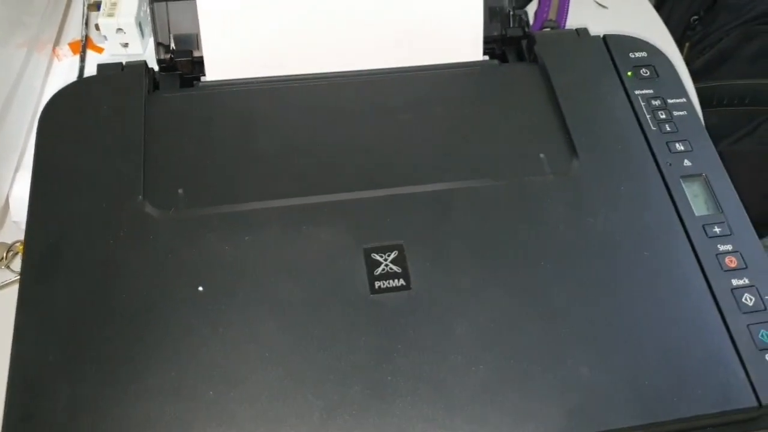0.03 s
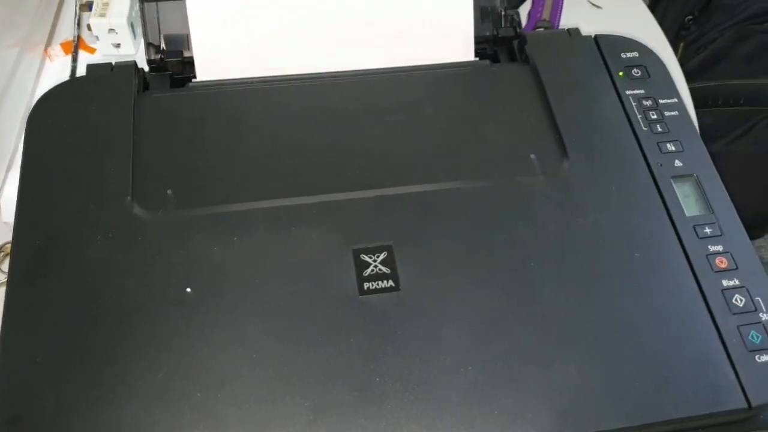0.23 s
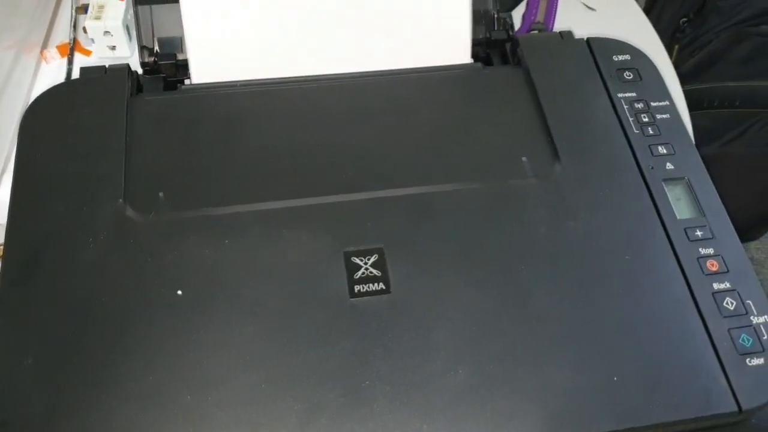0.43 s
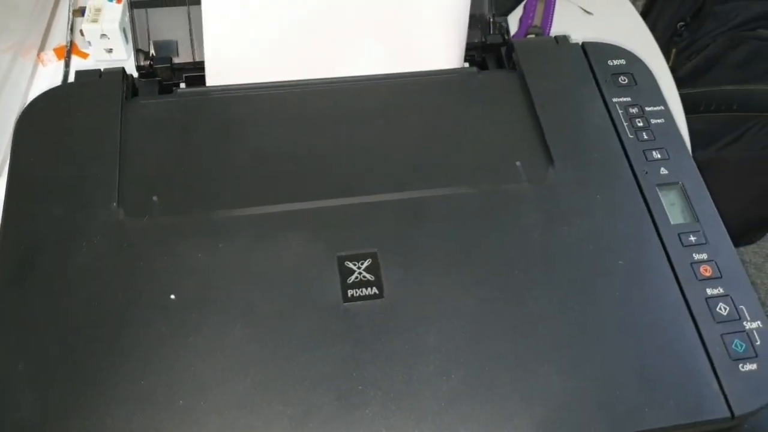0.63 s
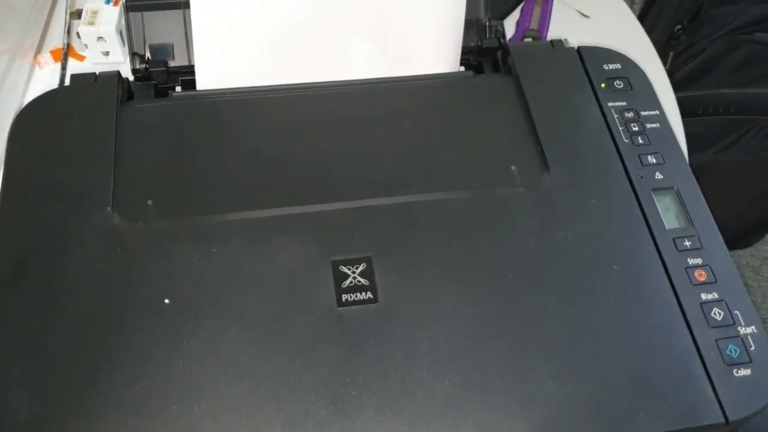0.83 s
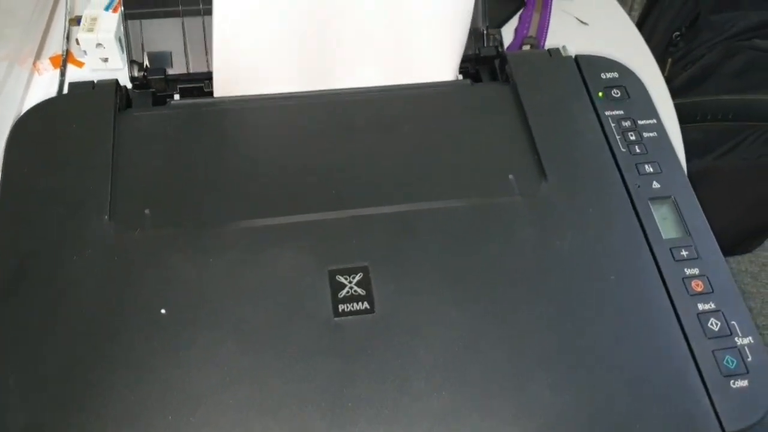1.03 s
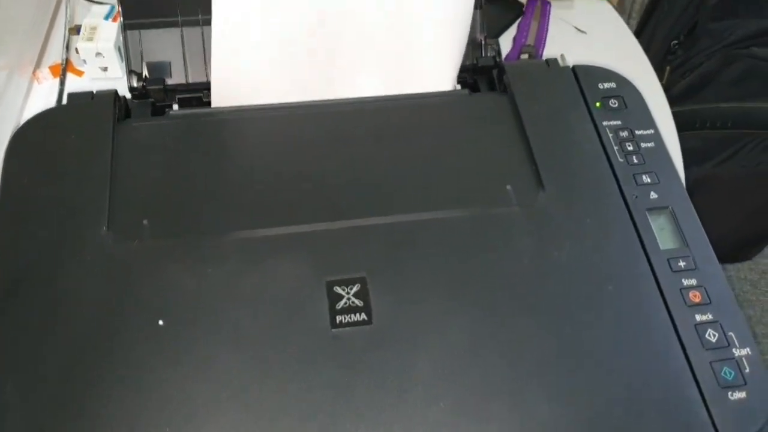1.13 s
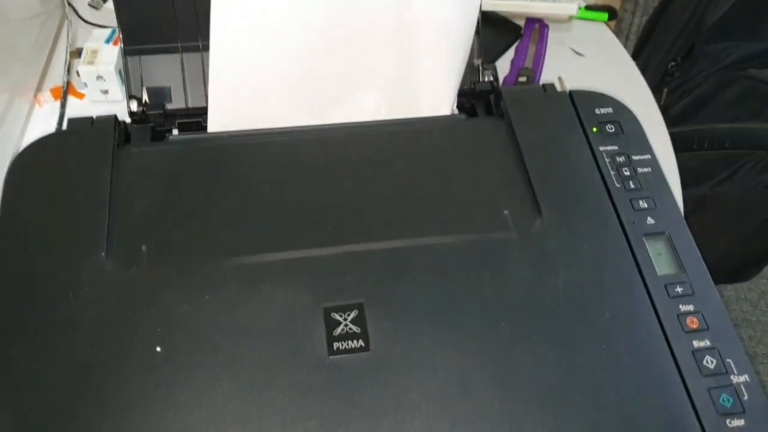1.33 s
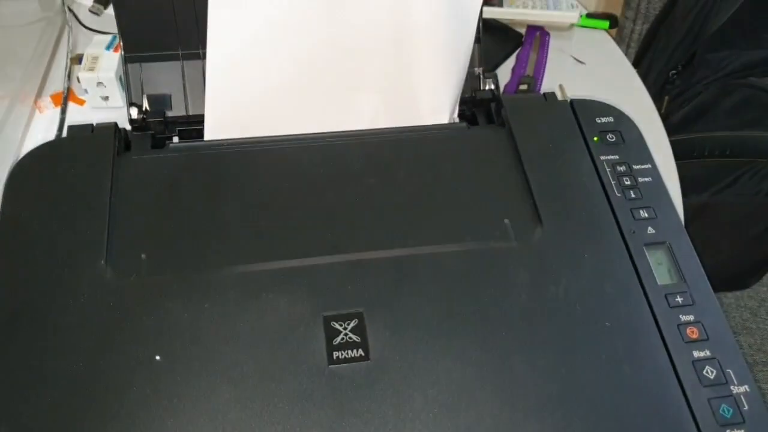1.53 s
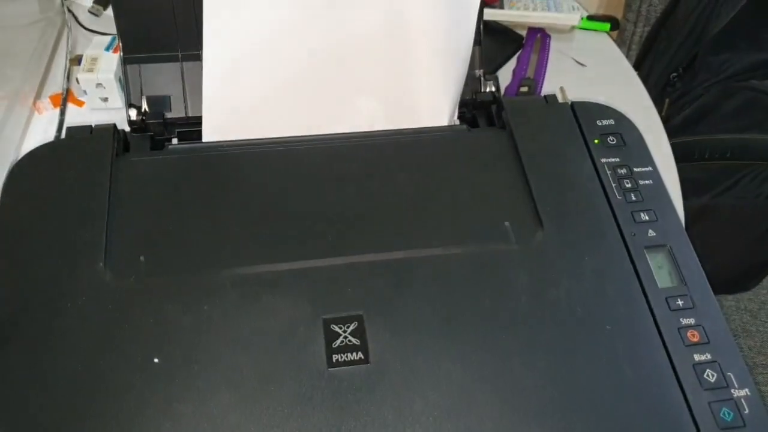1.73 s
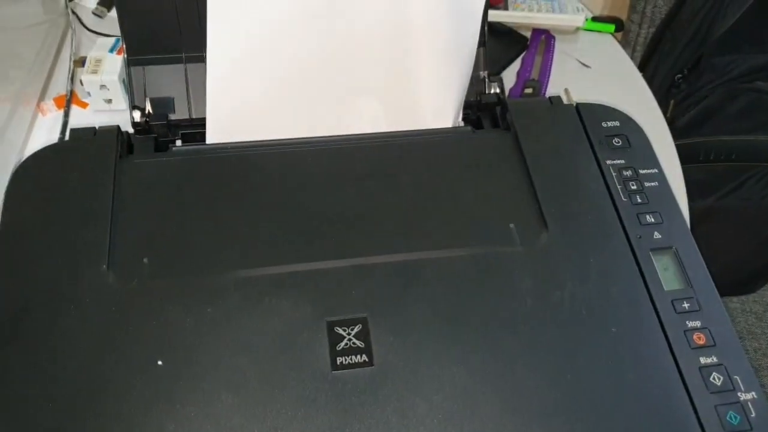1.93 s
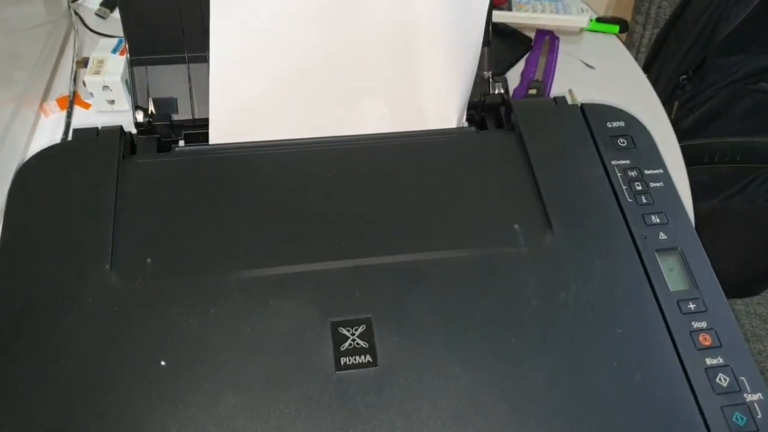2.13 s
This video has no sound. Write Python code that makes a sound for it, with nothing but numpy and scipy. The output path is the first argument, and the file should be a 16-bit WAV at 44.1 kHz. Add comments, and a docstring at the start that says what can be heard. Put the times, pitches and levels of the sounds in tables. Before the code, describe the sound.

A desktop printer feeds paper with a grainy whir in uneven bursts and hard plastic clacks, strongest early on, then fades to faint ticks and a softly humming small room, heard in close stereo.

```python
"""In a small room with air noise and a faint low hum, a desktop printer feeds a sheet.
Its whir, dense random contacts in filtered bands, starts at once and comes in uneven bursts.
Clacks soon join it, each a dying rattle plus a ringing knock; then brief gliding sine tones sing.
The whir winds down into the quiet room, whose short echoes are feedback delays.
A spaced pair of microphones listens from just above the lid."""
import sys
import numpy as np
from scipy import signal
from scipy.io import wavfile

SR = 44100
rng = np.random.default_rng(int(sys.argv[2]) if len(sys.argv) > 2 else 0)


def master_out(mix):
    """Clip the mix to full scale and print it as 16-bit PCM to the path in sys.argv[1]."""
    frames = np.transpose(np.atleast_2d(mix))
    ceiling = np.clip(frames, -1, 1)
    pcm = np.round(ceiling * 32767).astype(np.int16)
    wavfile.write(sys.argv[1], SR, pcm)


N = 97020  # samples, 2.2 s


def from_db(db):
    """Decibels to gain."""
    return 10 ** (np.asarray(db) / 20)


def rms_one(x):
    """Scale to unit rms."""
    return x / np.sqrt(np.mean(x ** 2) + 1e-20)


def at_hz(points, hz):
    """Read a spectrum table on a log-frequency axis."""
    table_hz, values = np.array(points).T
    return np.interp(np.log(hz), np.log(table_hz + 1), values)


def drift(rate_hz):
    """Slow random wander of spread 1: noise through a two-pole lowpass, at a fortieth of the sample rate."""
    step = 40
    r = np.exp(-2 * np.pi * rate_hz * step / SR)
    noise = rng.standard_normal(N // step + 2002)
    slow = signal.lfilter([1], [1, -2 * r, r * r], noise)[2000:]  # skip the filter's start
    return np.interp(np.arange(N) / step, np.arange(len(slow)), rms_one(slow))


def resonance(x, hz, width_hz):
    """Two-pole resonance of gain 1 on top."""
    r = np.exp(-np.pi * max(width_hz, 5) / SR)
    top = (1 - r * r) / 2 * np.array([1, 0, -1])
    return signal.lfilter(top, [1, -2 * r * np.cos(2 * np.pi * hz / SR), r * r], x)


BASS_HZ, TREBLE_HZ = 500, 7000


def by_range(hz, bass_db, treble_db):
    """Extra level of a band: bass below BASS_HZ, treble above TREBLE_HZ, each faded in over a half octave."""
    def fade(ratio):
        return np.clip(.5 + 2 * np.log2(ratio), 0, 1)
    return fade(BASS_HZ / hz) * bass_db + fade(hz / TREBLE_HZ) * treble_db


def band_power(colour):
    """Rms that unit white noise keeps between BASS_HZ and TREBLE_HZ after a colour."""
    hz = np.linspace(BASS_HZ, TREBLE_HZ, 500)
    mean_power = np.mean(from_db(2 * at_hz(colour, hz)))
    return np.sqrt(mean_power * (TREBLE_HZ - BASS_HZ) / (SR / 2))


# How alike the sound reaches the two microphones. Each row: frequency in Hz, likeness from 0 to 1.
MIC_LIKENESS = [(60, 0.89), (300, 1), (640, 0.52), (1400, 0), (3100, 0.063), (7000, 0)]
# How the sound leans between the microphones. Each row: frequency in Hz, left minus right in dB.
MIC_LEAN = [(60, -5.5), (300, 0), (2400, -1.5), (10000, 0.6)]


def bank(drive, gain_at, colour):
    """Excitation (2 draws x mid, side) shaped in third-octave bands, then spread over the microphone pair."""
    out = 0
    edges = 25 * 2 ** np.arange(0, 9.4, 1 / 3)
    for k, (low, high) in enumerate(zip(edges, edges[1:])):
        hz = np.sqrt(low * high)
        sos = signal.butter(2, [low, high], "band", fs=SR, output="sos")
        # neighbouring bands use different draws
        mid, side = signal.sosfilt(sos, drive[k % 2] * gain_at(hz) + 1e-18)
        alike = np.clip(at_hz(MIC_LIKENESS, hz), -1, 1)
        lean = from_db(at_hz(MIC_LEAN, hz) / 2 * np.array([[1], [-1]]))
        pair = np.sqrt(1 + alike) * mid + np.sqrt(1 - alike) * side * [[1], [-1]]
        out = out + from_db(at_hz(colour, hz)) * lean * pair
    return out


# Resonances of the plastic case. Each row: frequency in Hz, width in Hz, relative lift in dB.
CASE_MODES = [(247.8, 27.2, 3), (334.7, 32.7, 3), (400, 54, -4.5), (909, 69, 3), (1882, 66, 4)]


def case(x, share_db):
    """The plastic case adds its resonances to the sound, each at its lift plus a share."""
    return x + sum(from_db(db + share_db) * resonance(x, hz, width) for hz, width, db in CASE_MODES)


# Colour of the air in the room. Each row: frequency in Hz, relative density in dB per Hz.
AIR_COLOUR = [(25, -30.5), (50, -7.5), (100, -17), (400, -18), (520, -23.5), (2400, -24), (6300, -35),
              (8000, -76.5), (11500, -44.5), (15700, -66)]
AIR_DB = -52.5  # rms
HUM_HZ, HUM_WIDTH_HZ, HUM_DB = 114.4, 36, -56.5  # level is rms


def room_tone():
    """Steady air noise, and a low hum made of noise through two equal resonances, so that it wavers."""
    air = rms_one(bank(rng.standard_normal((2, 2, N)), lambda hz: 1, AIR_COLOUR))
    hum = rng.standard_normal(N + SR)
    for _ in range(2):
        hum = resonance(hum, HUM_HZ, HUM_WIDTH_HZ)
    hum = hum[SR:]  # starts already sounding
    return from_db(AIR_DB) * air + from_db(HUM_DB) * rms_one(hum)


# Course of the drive under the lid. Each row: time in seconds, level in dB before the patchiness and
# the case, bass in dB and treble in dB, both heard relative to their medians over the first half.
WHIR_COURSE = [(0, -47, 17.5, -12.5), (0.066, -50.5, 13, -31), (0.112, -35, 5, -6),
               (.17, -33.5, -0.5, -12.5), (.26, -34.5, 3, -12), (.37, -41, 3.5, -14),
               (.47, -34.5, 9.5, -16), (.53, -35.5, -1.5, -13.5), (0.616, -38.5, -3.5, -10.5),
               (.68, -49.5, 4.5, -18.5), (.76, -40, -2.5, -10.5), (.81, -46, 9.5, -12), (.912, -54, 3, -17),
               (0.927, -40, 4.5, -17), (1.04, -36, -0.5, -9.5), (1.11, -38, -2, -16.5),
               (1.15, -43.5, 4.5, -18.5), (1.4, -50.5, 3.5, -8.5), (1.518, -51, 10, -10.5),
               (1.55, -58, -6, -17), (1.579, -49, 11.5, -11.5), (1.66, -56, 2.5, -9), (1.739, -62, 6, -22)]
# Colour of the whir. Each row: frequency in Hz, relative density in dB per Hz.
WHIR_SPECTRUM = [(80, -17), (110, -6), (165, -16.5), (240, -8), (530, -10.5), (2770, -9), (5600, -14),
                 (8000, -30), (12500, -20), (15700, -72)]
CONTACTS_PER_S = 6000  # in each noise draw
WHIR_PATCHY_DB, WHIR_PATCHY_HZ = 2, 19.4
CASE_IN_WHIR_DB = -9


def whir():
    """Dense uneven tooth and roller contacts shake the case; the level follows the drive."""
    s, *columns = np.transpose(WHIR_COURSE)
    t = np.arange(N) / SR
    level_db, bass_db, treble_db = [np.interp(t, s, c) for c in columns]
    bass_db = bass_db - np.median(bass_db[:N // 2])
    treble_db = treble_db - np.median(treble_db[:N // 2])
    running = t < s[-1]
    shape = (2, 2, N)
    struck = rng.random(shape) < CONTACTS_PER_S / SR
    contacts = rms_one(struck * rng.choice([-1, 1], shape))

    def gain(hz):
        patchy_db = WHIR_PATCHY_DB * drift(WHIR_PATCHY_HZ)  # every band wanders by itself
        return running * from_db(level_db + by_range(hz, bass_db, treble_db) + patchy_db)

    shaken = bank(contacts, gain, WHIR_SPECTRUM)
    return case(shaken, CASE_IN_WHIR_DB) / band_power(WHIR_SPECTRUM)


ROOM_DB, ROOM_T60_S = -9, 0.13  # the decay time is that of the lows
WALL_CUT_HZ, ROOM_WIDE_HZ = 4200, 500


def room(x):
    """Six feedback delays a side, duller on every round; the lows reach both microphones alike."""
    out = np.zeros((2, N))
    dull = np.exp(-2 * np.pi * WALL_CUT_HZ / SR)
    lags = (rng.uniform(.012, .035, 12) * SR).astype(int)
    for k, lag in enumerate(lags):
        source = x[k % 2]
        loop, state = source.copy(), [0.]
        gain = from_db(-60 * lag / SR / ROOM_T60_S)
        for i in range(lag, N, lag):
            back, state = signal.lfilter([gain * (1 - dull)], [1, -dull], loop[i - lag:i], zi=state)
            loop[i:i + lag] += back[:N - i]
        out[k % 2] += (loop - source) * (-1) ** (k // 2)  # echoes only, of alternating sign
    highpass = signal.butter(2, ROOM_WIDE_HZ, "high", fs=SR, output="sos")
    side = signal.sosfilt(highpass, out[0] - out[1])
    return (out.sum(0) + side * [[1], [-1]]) / 2


# Lever clacks on the plastic case, close below the microphones. Each row: start in seconds, relative
# level in dB, accent frequency in Hz, relative bass in dB, relative treble in dB, and
# 60 dB decay time in seconds, which is the rattle's at 1 kHz.
CLACK_EVENTS = [(.106, -23.5, 5700, -13, -23, 0.38), (.127, -8.5, 3720, -8.5, -10, 0.055),
                (0.1303, -3, 6000, -54, -34, 0.035), (.141, -14.5, 3060, -4.5, -12, 0.074),
                (.201, -19, 940, -2, -17, 0.16), (.208, -12, 3240, -13.5, -10, 0.073),
                (.223, -15, 2830, -5.5, -19, 0.067), (.388, -24.5, 730, -6.5, -15, 0.13),
                (0.445, -20.5, 3640, -3, -14, 0.053), (0.479, -6.5, 3960, -44, -14.5, 0.048),
                (0.4815, -9.5, 855, -13.5, -14, 0.032), (0.594, -14.5, 1680, -22, -24, 0.012),
                (0.6124, -23.5, 4950, -25, -4, 0.012), (0.7261, -20.5, 2700, -11.5, -17.5, 0.04),
                (0.7493, -24.5, 3050, -11, -30, 0.028), (0.7609, -19.5, 1470, -16, -13, 0.044),
                (0.776, -21, 1480, -13, -14, 0.05), (0.915, -26, 3800, -2, -18, 0.052),
                (0.9251, -25, 4240, -12.5, -32, 0.023), (.948, -18.5, 936, -26, -16, 0.031),
                (1.0503, -6.5, 1830, -25, -21, 0.013), (1.058, -19, 1390, -16, -23, 0.15),
                (1.075, -18.5, 1350, -5.5, -18, 0.059), (1.085, -19, 837, -6, -17, 0.063),
                (1.169, -32.5, 4900, -8, -17, 0.043), (1.2602, -25, 6000, -27, -13, 0.018),
                (1.4076, -32, 1570, -11, -11, 0.035), (1.4462, -26, 1070, -12.5, -20, 0.033),
                (1.4966, -32.5, 3760, -34, -22, 0.015), (1.5555, -25, 1910, -17.5, -24, 0.082)]
# Colour of the clacks. Each row: frequency in Hz, relative density in dB per Hz.
CLACK_SPECTRUM = [(140, -45), (230, -11), (550, -5.5), (3580, 0.5), (6000, -7), (8000, -16), (12000, -14.5),
                  (15700, -45)]
CLACK_RISE_S, CLACK_DB = 0.0006, -10.5  # level is added to every row's
ACCENT_DB, ACCENT_OCTAVES = 9, 0.066
BASS_LONGER = 0.028  # decay time grows as (1 kHz / f) to this power
CASE_IN_CLACK_DB = -1


def clacks():
    """Each clack is a short dying rattle of contacts with its own accent; the lows last longer."""
    rows, t = np.array(CLACK_EVENTS), np.arange(SR // 4) / SR
    attack = 1 - np.exp(-t / CLACK_RISE_S)
    usual_bass_db, usual_treble_db = np.median(rows[:, 3:5], axis=0)

    def gain(hz):
        power = np.zeros(N + len(t))
        for s, db, accent_hz, bass_db, treble_db, t60 in rows:
            range_db = by_range(hz, bass_db - usual_bass_db, treble_db - usual_treble_db)
            accent_db = ACCENT_DB * np.exp(-.5 * (np.log2(hz / accent_hz) / ACCENT_OCTAVES) ** 2)
            fall_db = -60 * t / (max(t60, .005) * (1000 / hz) ** BASS_LONGER)
            level = from_db(db + range_db + accent_db + CLACK_DB + fall_db)
            i = int(s * SR)
            power[i:i + len(t)] += (level * attack) ** 2
        return np.sqrt(power[:N])

    rattle = rng.choice([-1., 1.], (2, 2, N))
    shaken = bank(rattle, gain, CLACK_SPECTRUM)
    return case(shaken, CASE_IN_CLACK_DB) / band_power(CLACK_SPECTRUM)


KNOCK_DB, THUD_DB = -4, 1.5  # added to the clack's level, and to its bass
KNOCK_CYCLES = 61  # cycles for a 60 dB fall, before the clack's own decay shortens the ring
THUD_TOP_HZ, THUD_RISE_S = 1000, 0.0053
HARD_DB_PER_HALVING = 0.5  # the shorter the clack, the harder its knock


def knocks():
    """The first contact of each clack rings the struck part briefly and thumps the low case modes."""
    out, t = np.zeros((2, N + SR)), np.arange(SR // 10) / SR
    phases = rng.uniform(-1, 1, (len(CLACK_EVENTS), 1)) * [[1, -1]]  # radians, opposite left and right
    modes = sum(from_db(db) * np.exp(-np.pi * width * t) * np.sin(2 * np.pi * hz * t)
                for hz, width, db in CASE_MODES if hz < THUD_TOP_HZ)
    thud = (1 - np.exp(-t / THUD_RISE_S)) * modes
    for (s, db, accent_hz, bass_db, _, t60), phase in zip(CLACK_EVENTS, phases):
        fall_db = -60 * t * (accent_hz / KNOCK_CYCLES + 2 / max(t60, .005))
        hard_db = HARD_DB_PER_HALVING * np.log2(0.03 / max(t60, .01))
        ring = from_db(fall_db + hard_db) * np.sin(2 * np.pi * accent_hz * t + phase[:, None])
        i = int(s * SR)
        out[:, i:i + len(t)] += from_db(db + KNOCK_DB) * (ring + from_db(bass_db + THUD_DB) * thud)
    return out[:, :N]


# Drive tones from inside the printer, equal at both microphones. Each row: start in seconds,
# end in seconds, start pitch in Hz, end pitch in Hz, rms level in dB; level and pitch waver around these.
DRIVE_TONES = [(0.308, 0.648, 238.7, 239.2, -46), (0.339, 0.44, 900, 860, -41.5),
               (0.577, 0.614, 907, 880, -39), (0.731, 0.834, 681, 594, -49.5), (0.97, 1.028, 247, 240, -39),
               (1.551, 1.63, 406, 322, -50.5)]
TONE_FADE_S = .018
TONE_WAVER_DB, TONE_WAVER_HZ = 2, 12.0
TONE_WOBBLE, TONE_WOBBLE_HZ = .009, 16.2  # wobble is a fraction of the pitch


def tones():
    """Motor and gear mesh sing briefly as sines on wavering pitches."""
    out, t = np.zeros(N), np.arange(N) / SR
    for start, end, start_hz, end_hz, db in DRIVE_TONES:
        fade = np.clip(np.minimum(t - start, end - t) / TONE_FADE_S, 0, 1)
        glide_hz = np.interp(t, [start, end], [start_hz, end_hz])
        hz = glide_hz * (1 + TONE_WOBBLE * drift(TONE_WOBBLE_HZ))
        level = from_db(db + TONE_WAVER_DB * drift(TONE_WAVER_HZ))
        out += np.sqrt(2) * fade * level * np.sin(2 * np.pi * np.cumsum(hz) / SR)
    return out


def scene():
    """The printer, its echoes and the room tone together."""
    printer = whir() + clacks() + knocks() + tones()
    return printer + from_db(ROOM_DB) * room(printer) + room_tone()


def record(dry):
    """The top is cut steeply, by 60 dB from 16 kHz up."""
    return signal.sosfilt(signal.cheby2(20, 60, 16000, fs=SR, output="sos"), dry)


dry = scene()
out = record(dry)
master_out(out)
```